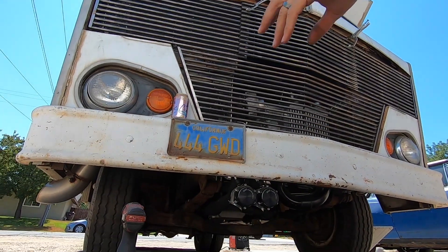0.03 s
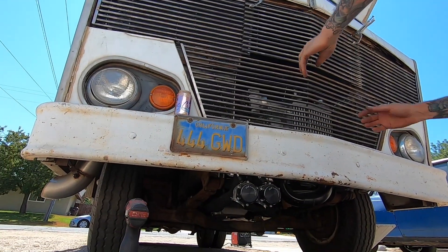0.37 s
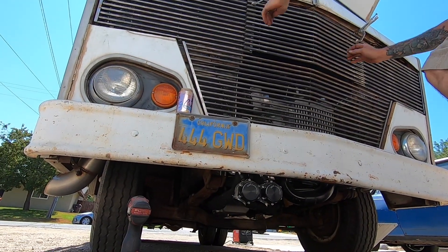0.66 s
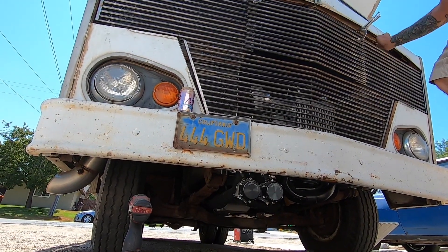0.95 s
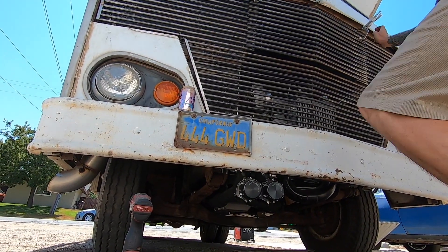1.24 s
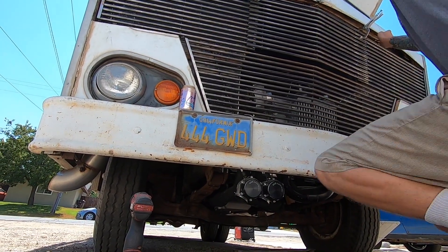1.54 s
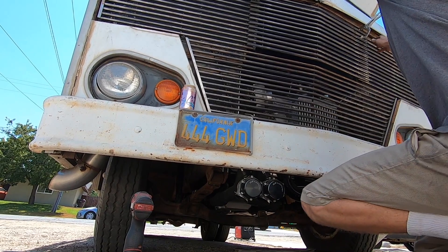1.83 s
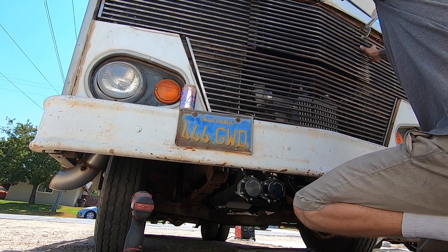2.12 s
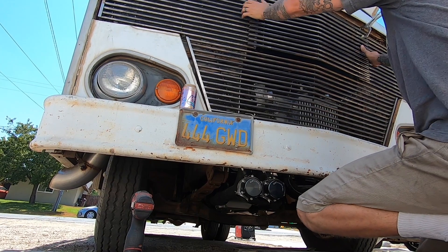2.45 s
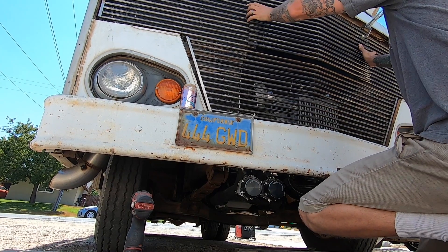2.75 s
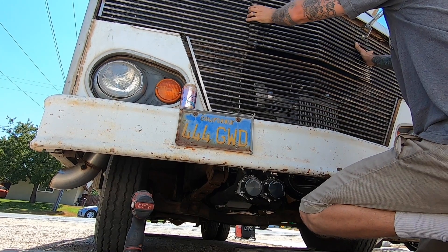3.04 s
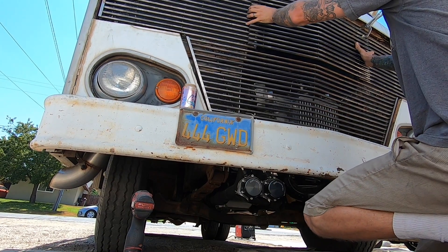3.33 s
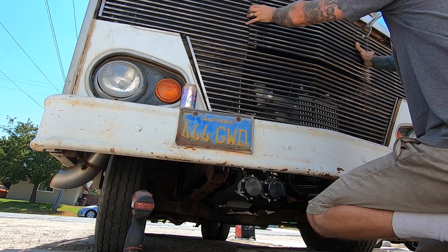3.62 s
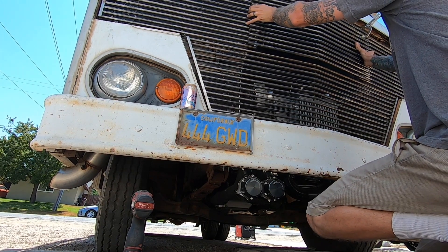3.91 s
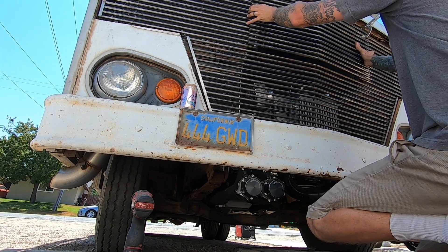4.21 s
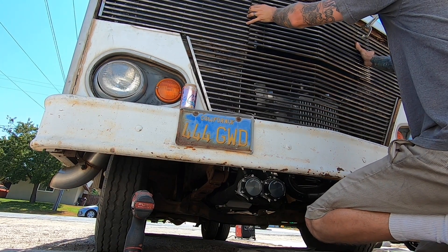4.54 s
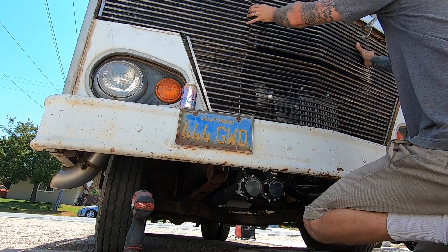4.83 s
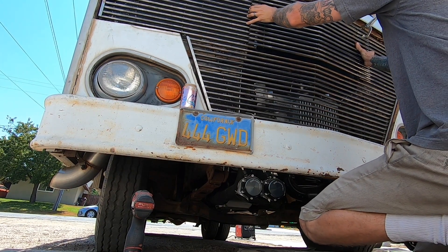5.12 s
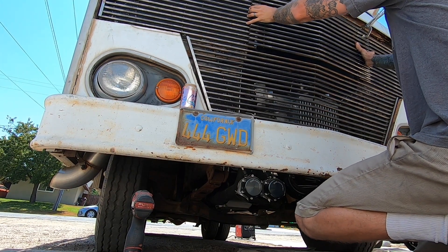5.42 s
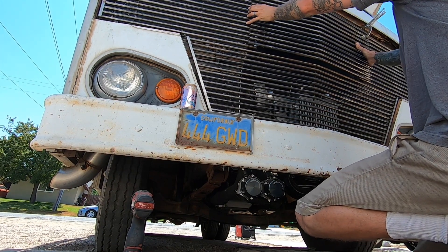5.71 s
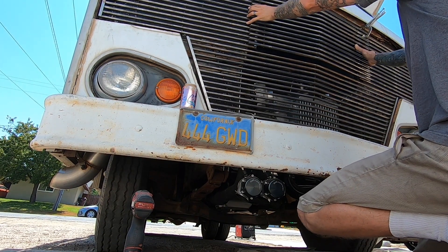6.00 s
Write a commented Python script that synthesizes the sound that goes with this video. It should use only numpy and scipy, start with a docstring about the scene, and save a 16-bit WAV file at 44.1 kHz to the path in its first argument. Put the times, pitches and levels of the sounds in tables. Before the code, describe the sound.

Gusts buffet the microphone outdoors as shoes scrape on gritty pavement and a few sharp knocks ring briefly on a metal grille close by. Under it all, a portable generator keeps up a low hum with a light metallic rattle and hiss. About halfway through the wind settles and the scuffs fade to a few ticks of grit, while the generator carries on with a far motor drone and faint bird whistles.

```python
"""A generator in the wind

A single-cylinder generator runs outdoors: periodic firing makes the exhaust hum and forces the cover
to ring, over valve ticks and fan hiss. Shoes scuff gritty concrete by friction, and knocks excite the
modes of a metal grille. Turbulent gusts buffet the microphone, mostly in the first seconds.
Behind these a second motor hums, a far drone slowly sinks and a bird whistles faintly."""
import sys
import numpy as np
from scipy import signal
from scipy.fft import rfft, irfft, next_fast_len
from scipy.io import wavfile
from scipy.ndimage import uniform_filter1d

SR = 44100
rng = np.random.default_rng(int(sys.argv[2]) if len(sys.argv) > 2 else 0)


def waveform_to_disk(signal):
    """Save audio, clipped to [-1, 1], as 16-bit WAV at the path in sys.argv[1]."""
    frames = np.transpose(np.atleast_2d(signal))
    scaled = np.clip(frames, -1, 1) * 32767
    samples = np.round(scaled).astype(np.int16)
    wavfile.write(sys.argv[1], SR, samples)


N = 276066
TIME = np.arange(N) / SR

# engine speed in four-stroke cycles: time_s, rate_hz
ENGINE_SPEED = [(0, 25.62), (0.3, 25.56), (0.7, 25.55), (1.3, 25.62), (1.7, 25.79), (2.3, 25.72),
                (2.8, 25.89), (3.05, 26.12), (3.4, 25.99), (3.8, 26.11), (4.3, 25.87), (4.8, 25.83),
                (5.05, 25.68), (5.35, 25.46), (5.65, 25.64), (6.0, 26.05), (6.26, 26.16)]
# exhaust harmonics: cycle_rate_multiple, level_db
EXHAUST_HARMONICS = [(1, -44.5), (2, -29), (5, -34), (6, -31), (7, -37), (8, -30), (9, -35.5), (10, -50.5),
                     (12, -37.5), (13, -48), (16, -47.5), (17, -49.5), (21, -55.5)]
# resonances of the engine cover: pitch_hz, bandwidth_hz, ring_db, rattle_db
COVER_MODES = [(807.3, 7.6, -52, -57.5), (821, 43, -62.5, -50), (1137.5, 19, -57.5, -58),
               (989, 35, -65, -58.5), (1289, 39, -66, -61), (1440, 73, -69, -57), (1727, 58, -72, -65.5),
               (1914, 180, -73.5, -60.5)]
# strength of the cover's ring: time_s, gain_db
COVER_RING_GAIN = [(0, -7), (0.7, 6.5), (1.55, 4), (1.87, 7), (2.0, 4.5), (2.8, -3), (3.08, 1.5),
                   (3.38, -3), (3.6, -4), (3.74, 4.5), (3.88, 2), (4.08, 2), (4.3, -2), (5.6, 1.5),
                   (6.26, 1.5)]
# strength of the fine hiss: time_s, level_db
HISS_ENVELOPE = [(0, -63.5), (1.8, -61.5), (2.05, -67.5), (3, -67), (3.7, -64), (6.26, -60)]
# spectra of the rumble, fan and hiss: frequency_hz, density_db
RUMBLE_SPECTRUM = [(20, -8.5), (45, -9.5), (70, -7), (110, 2), (170, 0), (270, -16.5), (350, -12.5),
                   (500, -17), (800, -19.5), (1300, -29.5)]
FAN_SPECTRUM = [(400, -12), (900, 6), (1400, 3.5), (2000, 0), (2600, -1.5), (3400, -5), (4200, -12.5),
                (5200, -16.5), (5900, -31)]
HISS_SPECTRUM = [(3000, 0.5), (5000, 0.5), (6000, 2), (6400, 4), (7250, -1.5), (7750, 0), (8400, -3),
                 (10000, -11.5), (11200, -19.5)]

# strongest gusts: centre_s, length_s, swirl_db, buffet_db
WIND_GUSTS = [(0.526, 0.28, -22, -30), (0.966, 0.067, -36, -25), (1.122, 0.041, -41, -22.5),
              (1.255, 0.22, -47, -25.5), (1.494, 0.055, -29, -25.5), (1.784, 0.27, -34.5, -23),
              (2.066, 0.028, -19, -48), (2.312, 0.035, -20.5, -32), (2.429, 0.064, -20.5, -19),
              (2.546, 0.051, -22.5, -23), (2.664, 0.15, -30, -22.5), (3.437, 0.053, -22.5, -34),
              (5.41, 0.079, -27.5, -29.5)]
# pressure pulses on the microphone: start_s, level_db, pitch_hz, decay_s
WIND_THUMPS = [(1.0977, -10.5, 183.4, 0.025), (1.106, -19, 383, 0.0061), (1.168, -7.5, 191, 0.0061),
               (1.204, -8, 232, 0.004), (1.8, -6.5, 116, 0.0058), (2.387, -9, 300, 0.0066),
               (2.397, -9, 160, 0.007), (2.4173, -2, 215, 0.0016), (2.414, -16, 340, 0.016),
               (2.427, -2.5, 119, 0.0065), (2.459, -7.5, 119, 0.0049), (2.542, -19.5, 231, 0.022),
               (2.546, -20.5, 353, 0.025), (2.696, -4.5, 140, 0.0068), (5.385, -17.5, 261, 0.013)]
# spectra of deep swirl, buffeting and breeze: frequency_hz, density_db
SWIRL_SPECTRUM = [(18, -8), (35, 3), (60, 8.5), (90, 12.5), (125, 8), (165, 8.5), (200, -13), (280, -19)]
BUFFET_SPECTRUM = [(40, -30), (100, -3), (150, 3), (210, -3), (270, -4.5), (360, -8.5), (480, -20),
                   (600, -20.5), (750, -30), (1100, -32)]
BREEZE_SPECTRUM = [(12, -25.5), (20, 0), (112, -5.5), (214, -11.5), (276, -19), (321, -15.5), (500, -25),
                   (650, -67.5), (1100, -120)]

# shoe scuffs: peak_s, level_db, length_s, treble_gain_db, ring_hz, ring_gain_db
SHOE_SCUFFS = [(0.17, -29.5, 0.025, 2, 1650, -6.5), (0.275, -35.5, 0.027, 8, 1330, 4.5),
               (0.824, -31, 0.015, -3, 1800, -5.5), (0.988, -42, 0.034, -4, 870, 8),
               (1.112, -35, 0.026, 5.5, 554, 2.5), (1.223, -28.5, 0.023, 9, 3420, -14),
               (1.73, -52, 0.036, 12.5, 646, 9), (1.818, -57.5, 0.037, 9, 900, 9.5),
               (1.888, -54, 0.028, 12, 805, 13), (2.417, -54, 0.06, -4, 557, 10),
               (2.56, -51, 0.047, 0, 600, 11), (3.47, -59.5, 0.07, 4, 580, 9),
               (3.61, -60, 0.04, 2, 570, 13), (3.672, -60.5, 0.045, 14.5, 3930, -19)]
# slides that lead into a scuff: peak_s, level_db, length_s
SOLE_SLIDES = [(0.14, -37.5, 0.13), (0.812, -41, 0.033)]
# tones of a squealing sole: start_hz, end_hz, level_db
SQUEAL_TONES = [(7760, 7480, -54.5), (9850, 10600, -59)]
# snapping grains: peak_s, level_db, ring_hz
GRIT_SNAPS = [(0.0877, -39, 4400), (0.3326, -39.5, 5030), (1.0435, -45, 6500), (1.064, -41, 5500),
              (1.3643, -47, 3000), (1.4222, -41.5, 5100), (1.561, -39.5, 4530), (1.7384, -34.5, 4500),
              (2.4354, -41, 5200), (5.162, -36.5, 7800)]
# knocks on the grille: time_s, ring_db, crack_db, crack_top_hz, place (0 on the frame, 1 on a slat)
GRILLE_KNOCKS = [(0.1692, -30, -25, 3200, 0.0), (0.175, -50, -27, 3400, 0.36), (0.28, -44, -30, 4200, 0.4),
                 (0.818, -48, -28, 3000, 0.68), (0.823, -32, -28, 2800, 0.94),
                 (1.2166, -39, -16.5, 8550, 0.23), (1.2214, -35, -17.5, 7040, 0.87),
                 (1.227, -46, -33, 4500, 0.61)]
# modes of the grille: pitch_hz, frame_struck_db, slat_struck_db, t60_s
GRILLE_MODES = [(615, -5, -7, 0.07), (810, -11, 6.5, 0.12), (950, -2.5, -7, 0.09), (1137, -2, -8.5, 0.13),
                (1435, -8, -4, 0.062), (1710, -1, -1, 0.065), (1970, -6.5, 3, 0.095),
                (2170, -4, -11, 0.091), (2950, 4.5, 0, 0.055), (3040, -6, 1.5, 0.12),
                (3460, -3, -12, 0.089), (3670, -8.5, -16, 0.1), (4350, -5.5, -10, 0.08),
                (4700, -13, -14, 0.06)]
# spectra of grinding grit, snapping grit and metal striking metal: frequency_hz, density_db
GRIT_SPECTRUM = [(300, 1), (700, 1.5), (1200, -4), (1800, 4), (2400, 3.5), (3200, 2.5), (4200, -2.5),
                 (5300, -7), (6200, -14.5), (8000, -18.5), (11000, -24), (13000, -33)]
SNAP_SPECTRUM = [(2000, -8), (4500, 2.5), (7500, -10), (10500, -8.5), (12000, -17.5)]
CRACK_SPECTRUM = [(400, -1), (1800, 0), (5200, 0), (6000, -14), (11000, -17), (14000, -28)]

# strength of the far drone: time_s, level_db
DRONE_ENVELOPE = [(0, -29), (0.5, -19), (1.2, -25.5), (2, -22.5), (2.9, -27), (4.3, -24.5), (6.26, -31)]
# harmonics of the second motor: pitch_hz, level_db
MOTOR_HARMONICS = [(85.3, -35), (170.6, -43.5), (255.9, -47), (341.2, -64.5)]
# bird whistles: start_s, length_s, start_hz, end_hz, level_db
BIRD_WHISTLES = [(0.608, 0.17, 4400, 4300, -55), (4.518, 0.066, 4600, 4470, -60),
                 (4.567, 0.2, 4170, 3920, -60), (5.894, 0.12, 4450, 4660, -64)]
# stereo width of the noises: frequency_hz, side_to_mid_db
STEREO_WIDTH = [(100, -37), (300, -33.5), (650, -7), (1400, -5), (2800, -6.5), (5500, 0), (10000, 3.5)]


def exhaust(cycles, waver_db=1.24, gain_db=2.5, fade_db_per_s=1.02, effort_db_per_hz=2.5, smear=0.21):
    """Periodic firing gives a harmonic series; dispersion in the muffler smooths the throb."""
    tones = 0
    for k, db in EXHAUST_HARMONICS:
        phase = k * cycles - smear * k ** 2 / 2  # higher harmonics are delayed more
        tones += from_db(db + waver_db * drift(2.6)) * np.sin(2 * np.pi * phase)
    speed = in_time(ENGINE_SPEED)
    effort_db = effort_db_per_hz * (speed - speed.mean())
    return np.sqrt(2) * from_db(gain_db + effort_db - fade_db_per_s * TIME) * tones


def cover(cycles, pan_db=5.0, lag_s=0.0001, waver_db=1.36):
    """Forced vibration: each firing kicks the cover, which sings where a harmonic meets a resonance."""
    kicks = np.diff(np.floor(cycles), prepend=0)
    ring = rattle = 0
    for hz, width_hz, ring_db, rattle_db in COVER_MODES:
        mode = resonate(kicks, hz, width_hz)
        ring += from_db(ring_db) * rms_one(resonate(mode, hz, hz / 6))
        rattle += from_db(rattle_db) * ringing(hz, width_hz)
    ring = np.array([np.interp(TIME - lag_s, TIME, ring), ring])  # reaches the right side first
    ring *= from_db(waver_db * drift(10) + in_time(COVER_RING_GAIN))
    return (ring + rattle) * from_db([[-pan_db], [pan_db]])


def valve_gear(cycles, tick_db=-70, whine_db=-62.5, whine_hz=3065, surge_db=6, windy_db=4.5):
    """Amplitude modulation: the valve gear jingles and a thin metal whine flutters once a cycle."""
    throb = np.cos(2 * np.pi * cycles)
    jingle = from_db(tick_db) * (1 + 0.83 * throb) * (ringing(3920, 70) + 0.9 * ringing(3775, 35))
    whine = (1 + 0.34 * throb) * sine(whine_hz + 12 * drift(42))
    surges = np.tanh(2 * (drift(29) - 0.73))  # mostly low, now and then high
    whine = rms_one(whine * from_db(surge_db * surges))
    return jingle + from_db(whine_db + windy_db * windy()) * whine


def cooling_air(cycles, rumble_db=-35, calm_rush_db=-50, windy_db=6):
    """Broadband noise: the fan's rush pulses three times a cycle, between a rumble and a fine hiss."""
    pulse = 1 + 0.065 * np.cos(2 * np.pi * 3 * cycles)
    rush = from_db(calm_rush_db + windy_db * windy() + 0.5 * drift(25)) * pulse * noise(FAN_SPECTRUM)
    hiss = from_db(in_time(HISS_ENVELOPE) + 2.1 * drift(7.7)) * noise(HISS_SPECTRUM)
    return from_db(rumble_db) * noise(RUMBLE_SPECTRUM) + rush + hiss


def wind(flow_db=-27, lull_db=-8.5, restless_db=3, gust_gain_db=2.5):
    """Turbulence at the microphone: gusts add in power to a flow that eases after the windy spell."""
    flow = from_db(flow_db + lull_db * (1 - windy()) + restless_db * drift(24))
    swirl = buffet = 0
    for centre_s, length_s, swirl_db, buffet_db in WIND_GUSTS:
        gust = from_db(gust_gain_db) * np.exp(-2 * ((TIME - centre_s) / length_s) ** 2)
        swirl += from_db(swirl_db) * gust
        buffet += from_db(buffet_db) * gust
    deep = np.hypot(flow, swirl) * even(noise(SWIRL_SPECTRUM))
    rough = np.hypot(flow, buffet) * even(noise(BUFFET_SPECTRUM))
    return deep + rough


def thumps(rise_s=0.0016, top_hz=650):
    """Damped oscillation: the hardest buffets are brief, low swings of pressure."""
    swings = 0
    for start_s, db, hz, decay_s in WIND_THUMPS:
        envelope = from_db(db) * swell(start_s + rise_s, rise_s, decay_s)
        swings += envelope * np.sin(2 * np.pi * hz * (TIME - start_s))
    return butterworth(swings, top_hz)


def shoes(grain_db=1, ring_width_hz=220, treble_hz=4000, slide_top_hz=5000):
    """Sliding friction: soles rub dully, then grind over grit, each contact with its own resonance."""
    grit = noise(GRIT_SPECTRUM, from_db(grain_db * drift(370)))
    treble = butterworth(grit, treble_hz, "high", order=1)
    scuffs = 0
    for peak_s, db, length_s, treble_db, ring_hz, ring_db in SHOE_SCUFFS:
        ring = from_db(ring_db + 2.5) * rms_one(resonate(grit, ring_hz, ring_width_hz))
        contact = grit + (from_db(treble_db) - 1) * treble + ring
        scuffs += from_db(db) * stroke(peak_s, length_s, rise_share=0.36) * contact
    slides = sum(from_db(db) * stroke(s, length_s, rise_share=0.78) for s, db, length_s in SOLE_SLIDES)
    return scuffs + slides * butterworth(grit, slide_top_hz)


def grille(scatter_db=2.5, ring_top_hz=5500):
    """Impact excitation: each knock cracks and rings the modes, weighted by where it lands."""
    crack, cracks, rings = noise(CRACK_SPECTRUM), 0, 0
    for s, _, db, top_hz, _ in GRILLE_KNOCKS:
        envelope = from_db(db) * swell(s, rise_s=0.0012, decay_s=0.0022)
        cracks += envelope * rms_one(butterworth(crack, top_hz))
    times, ring_db, _, _, place = np.transpose(GRILLE_KNOCKS)
    for hz, frame_db, slat_db, t60_s in GRILLE_MODES:
        mode_db = ring_db + frame_db + (slat_db - frame_db) * place
        impulses = np.zeros(N)
        impulses[(times * SR).astype(int)] = from_db(rng.normal(mode_db, scatter_db))
        r, w = from_db(-60 / (t60_s * SR)), 2 * np.pi * hz / SR
        rings += signal.lfilter([0, np.sin(w)], [1, -2 * r * np.cos(w), r * r], impulses + 1e-18)
    return cracks + butterworth(rings, ring_top_hz)


def snaps(gain_db=-9, ring_width_hz=1100):
    """Brittle fracture: a grain gives a bright burst and a brief ring; finer grains have less body."""
    crack, out = noise(SNAP_SPECTRUM), 0
    for s, db, hz in GRIT_SNAPS:
        burst = swell(s, rise_s=0.00046, decay_s=0.009) * butterworth(crack, 0.7 * hz, "high")
        ring = swell(s, rise_s=0.0005, decay_s=0.0048) * rms_one(resonate(crack, hz, ring_width_hz))
        out += from_db(db + gain_db) * (burst + ring)
    return out


def squeal(peak_s=0.14, waver=0.025, rough_db=4):
    """Stick-slip friction: two thin, unsteady tones glide apart and swell until the sole grips."""
    out = 0
    for start_hz, end_hz, db in SQUEAL_TONES:
        glide_hz = start_hz + (end_hz - start_hz) * ramp(0, peak_s)
        tone = sine(glide_hz * (1 + waver * drift(420)))
        out += from_db(db + rough_db * drift(250)) * tone
    return out * swell(peak_s, rise_s=0.045, decay_s=0.021)


def loose_grit(ticks_per_s=4.8, level_db=-64, spread_db=1, decay_s=0.008):
    """A Poisson process: grains shift underfoot at random, each with a faint, decaying tick."""
    onsets = (rng.random(N) < ticks_per_s / SR) * from_db(rng.normal(level_db, spread_db, N))
    envelope = signal.lfilter([1], [1, -np.exp(-1 / (decay_s * SR))], onsets + 1e-18)
    return envelope * noise(SNAP_SPECTRUM)


def far_drone(start_hz=112.1, sag_hz_per_s=0.58):
    """A linear glide: one distant pure tone sinks as its level swells and fades."""
    return np.sqrt(2) * from_db(in_time(DRONE_ENVELOPE)) * sine(start_hz - sag_hz_per_s * TIME)


def second_motor(wander_s=0.00059, waver_db=2):
    """Steady rotation gives a hum whose harmonics wander together in phase."""
    clock, hum = TIME + wander_s * drift(0.45), 0
    for hz, db in MOTOR_HARMONICS:
        hum += from_db(db + waver_db * drift(1)) * np.sin(2 * np.pi * (hz * clock + rng.random()))
    return np.sqrt(2) * hum


def breeze(level_db=-41):
    """Antiphase pressure: light eddies push the two microphone ports in opposite directions."""
    return from_db(level_db) * noise(BREEZE_SPECTRUM)[0] * [[1], [-1]]


def bird(waver_hz=45, flicker_db=2):
    """Random modulation of pitch and level blurs the gliding whistles of a distant bird."""
    out, waver = 0, waver_hz * drift(170)
    for start_s, length_s, start_hz, end_hz, db in BIRD_WHISTLES:
        progress = ramp(start_s, length_s)
        pitch_hz = start_hz + (end_hz - start_hz) * progress + waver
        out += from_db(db) * np.sin(np.pi * progress) * sine(pitch_hz)
    return out * from_db(flicker_db * (drift(50) + 0.5))


def windy(attack_s=0.23, end_s=2.99, release_s=0.64):
    """Envelope of the windy spell: 1 while it holds, 0 in the calm."""
    return ramp(0, attack_s) * (1 - ramp(end_s - release_s, release_s))


def from_db(db):
    """Decibels to amplitude ratio."""
    return 10 ** (np.asarray(db) / 20)


def rms_one(x):
    """Normalisation to unit rms."""
    return x / np.sqrt(np.mean(x ** 2) + 1e-20)


def in_time(curve):
    """Linear interpolation of a curve at every sample."""
    return np.interp(TIME, *np.transpose(curve))


def at_hz(spectrum, hz):
    """Interpolation on a log-frequency axis."""
    known_hz, values = np.transpose(spectrum)
    return np.interp(np.log(hz + 1e-3), np.log(known_hz), values)


def sine(pitch_hz):
    """An oscillator whose phase is the integral of its frequency."""
    return np.sin(2 * np.pi * np.cumsum(pitch_hz) / SR)


def drift(corner_hz, step=40, settle=2000):
    """Low-passed noise: a random fluctuation of unit rms."""
    r = np.exp(-2 * np.pi * corner_hz * step / SR)
    white = rng.standard_normal(N // step + settle + 2)
    slow = signal.lfilter([1], [1, -2 * r, r * r], white)[settle:]
    return np.interp(np.arange(N) / step, np.arange(len(slow)), rms_one(slow))


def noise(spectrum, grain=1):
    """Spectral shaping: stereo noise of unit rms, falling steeply above the spectrum's last point."""
    size = next_fast_len(N)
    hz = np.fft.rfftfreq(size, 1 / SR)
    gain = from_db(at_hz(spectrum, hz)) / np.maximum(hz / spectrum[-1][0], 1) ** 8
    mid, side = rfft(rng.standard_normal((2, N)) * grain, size) * gain
    side *= from_db(at_hz(STEREO_WIDTH, hz))
    return rms_one(irfft([mid + side, mid - side], size)[:, :N])


def even(x, span_s=0.079):
    """Division by the running rms takes the slow swells out of a noise."""
    return x / np.sqrt(uniform_filter1d(np.mean(x ** 2, axis=0), int(span_s * SR)) + 1e-9)


def butterworth(x, corner_hz, kind="low", order=2):
    """A filter with a maximally flat passband."""
    return signal.sosfilt(signal.butter(order, corner_hz, kind, fs=SR, output="sos"), x)


def resonate(x, hz, width_hz):
    """A two-pole resonance."""
    r = np.exp(-np.pi * width_hz / SR)
    return signal.lfilter([1 - r, 0, r - 1], [1, -2 * r * np.cos(2 * np.pi * hz / SR), r * r], x + 1e-18)


def ringing(hz, width_hz):
    """Random excitation of a resonance, in stereo at unit rms."""
    mode = resonate(rng.standard_normal((2, N)), hz, width_hz)
    mid, side = resonate(mode, hz, hz / 4)
    side *= from_db(at_hz(STEREO_WIDTH, hz))
    return rms_one(np.array([mid + side, mid - side]))


def ramp(start_s, length_s):
    """Linear rise from 0 to 1."""
    return np.clip((TIME - start_s) / length_s, 0, 1)


def swell(peak_s, rise_s, decay_s):
    """Exponential rise to 1, then exponential decay."""
    exponent = np.maximum((peak_s - TIME) / rise_s, (TIME - peak_s) / decay_s)
    return np.exp(-np.minimum(exponent, 20))


def stroke(peak_s, length_s, rise_share):
    """A swell whose two time constants sum to length_s."""
    return swell(peak_s, rise_share * length_s, (1 - rise_share) * length_s)


def scene():
    """Superposition of all sources; one cycle count keeps the generator's parts in step."""
    cycles = np.cumsum(in_time(ENGINE_SPEED)) / SR
    generator = exhaust(cycles) + cover(cycles) + valve_gear(cycles) + cooling_air(cycles)
    person = shoes() + snaps() + squeal() + loose_grit() + grille()
    return generator + person + far_drone() + second_motor() + wind() + thumps() + breeze() + bird()


def record(dry, opens_at_s=2.38, opening_s=1.56, bottom_hz=18, top_hz=15500):
    """Mid-side mixing opens the image from mono to stereo; band limiting cuts both extremes."""
    mid = dry.mean(axis=0)
    image = mid + ramp(opens_at_s, opening_s) * (dry - mid)
    top_cut = signal.cheby2(12, 70, top_hz, fs=SR, output="sos")
    return signal.sosfilt(top_cut, butterworth(image, bottom_hz, "high"))


dry = scene()
out = record(dry)
waveform_to_disk(out)
```